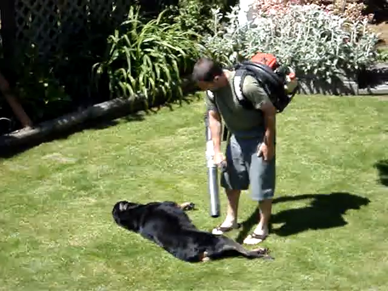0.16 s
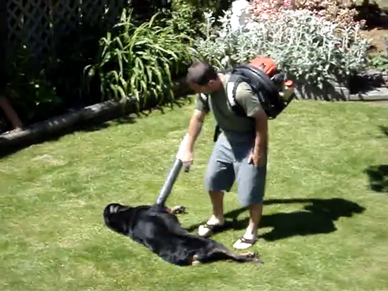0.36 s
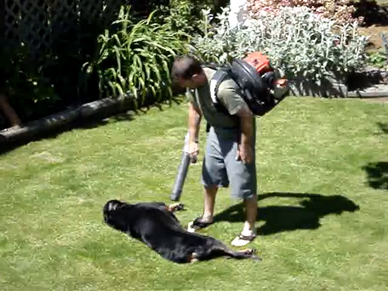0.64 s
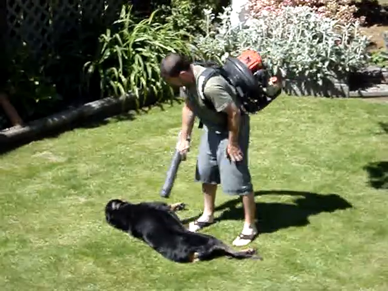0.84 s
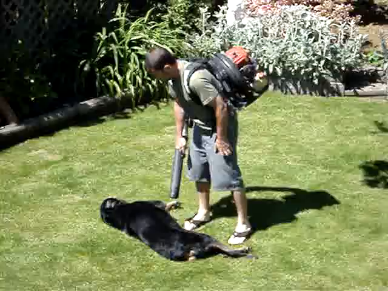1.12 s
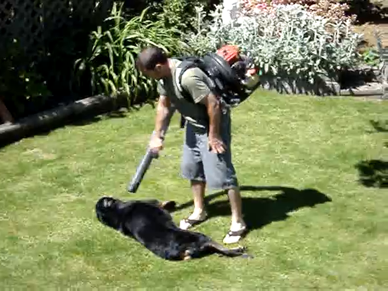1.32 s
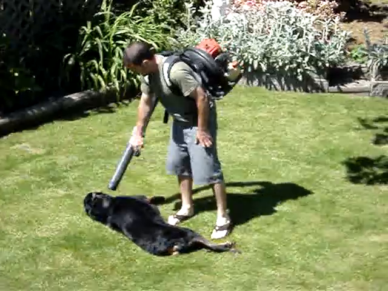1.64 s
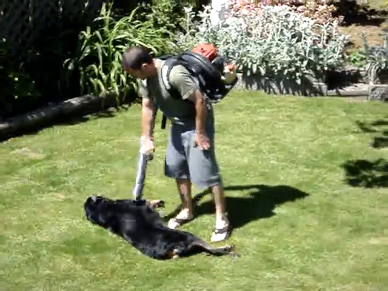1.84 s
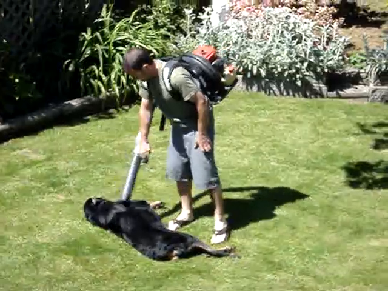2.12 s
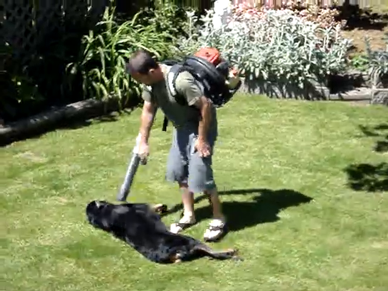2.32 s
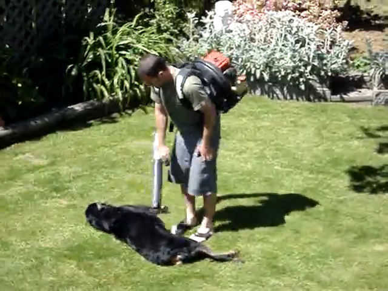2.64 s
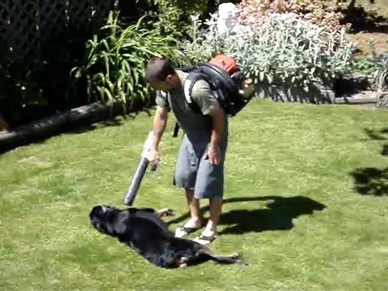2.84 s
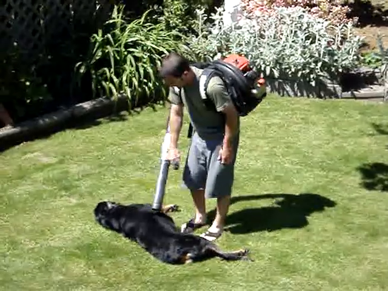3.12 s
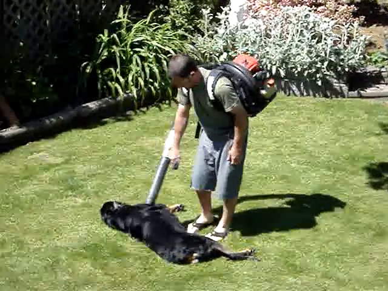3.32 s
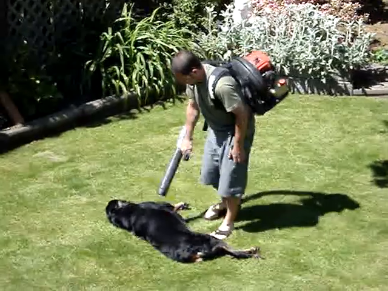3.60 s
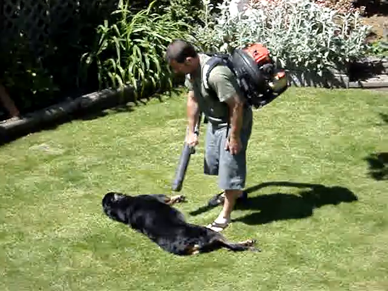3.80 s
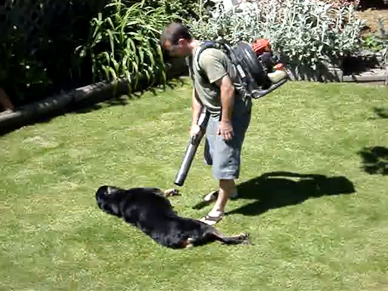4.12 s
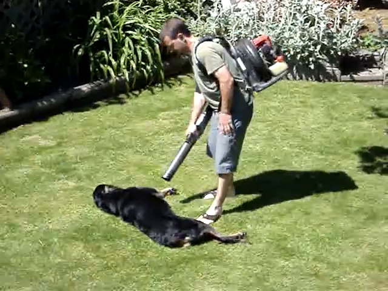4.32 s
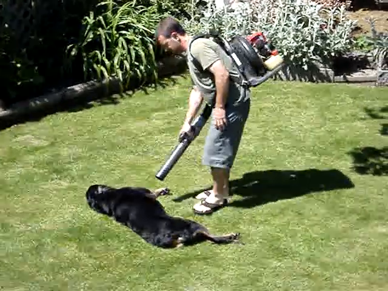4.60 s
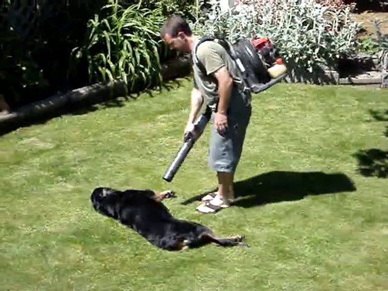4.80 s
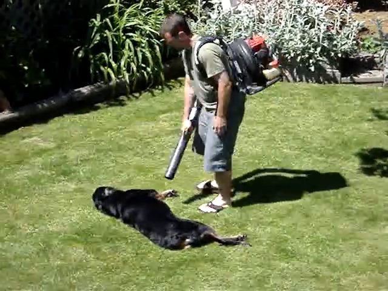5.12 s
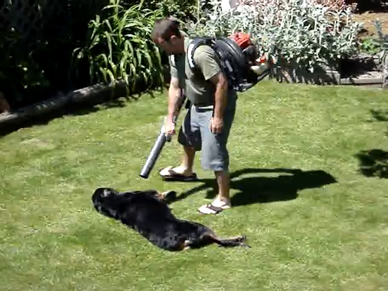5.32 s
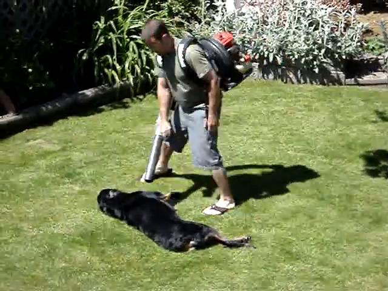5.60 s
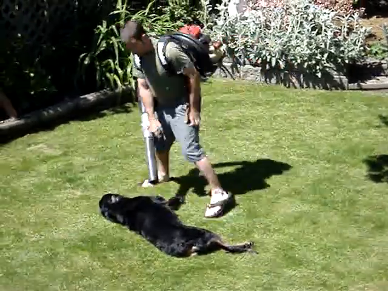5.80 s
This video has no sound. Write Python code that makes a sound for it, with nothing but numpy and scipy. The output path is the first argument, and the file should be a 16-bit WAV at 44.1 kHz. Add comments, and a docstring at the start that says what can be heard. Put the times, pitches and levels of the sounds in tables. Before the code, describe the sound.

Constant petrol blower noise in a garden: buzzing engine hum, thin whine above, roaring air jet that shifts slightly in tone as the tube swings.

```python
"""A loud buzzing hum with a whine above it and rushing air below: a two-stroke backpack leaf blower on a lawn.
Exhaust pulses, one per shaft turn, make the hum; a twelve-blade fan on the same shaft makes blade tone and whine.
Coloured noise makes the air jet. Tone changes as the carrier turns; garden reflections make single
harmonics swell and fade. The loud sound flattens the upper crests in the microphone."""
import sys
import numpy as np
from scipy import signal
from scipy.io import wavfile
from scipy.ndimage import uniform_filter1d, map_coordinates

SR = 44100
rng = np.random.default_rng(int(sys.argv[2]) if len(sys.argv) > 2 else 0)


def put_to_file(sound):
    """Save the sound as 16-bit audio at rate SR, in the file named by the first command-line argument."""
    columns = np.atleast_2d(sound).T  # one column per channel
    safe = np.clip(columns, -1, 1)
    whole_steps = np.round(safe * 32767)
    wavfile.write(sys.argv[1], SR, whole_steps.astype(np.int16))


N = 262395
T = np.arange(N) / SR
BLADES = 12


def gain_of(db):
    """Decibels to amplitude factor."""
    return 10 ** (np.asarray(db) / 20)


def evened(x):
    """Scale to rms 1."""
    return x / np.sqrt(np.mean(x ** 2) + 1e-20)


def curve(rows):
    """Two-column table joined by straight lines in time."""
    t_s, values = np.transpose(rows)
    return np.interp(T, t_s, values)


def wander(rate_hz):
    """Smooth random curve of rms 1, rate_hz random steps per second."""
    steps = rng.standard_normal(4096)
    coarse_s = T[::64]
    smooth = map_coordinates(steps, [coarse_s * rate_hz], order=3, mode="wrap")
    return evened(np.interp(T, coarse_s, smooth))


def seen_from(stance, levels_db):
    """Level at this stance, interpolated between the three sides."""
    return np.interp(stance, np.arange(len(levels_db)), levels_db)


def reflected(share, rate_hz):
    """Complex gain of direct sound plus shifting reflections; share = reflected/direct strength."""
    echoes = (wander(rate_hz) + 1j * wander(rate_hz)) / np.sqrt(2)
    return (1 + share * echoes) / np.sqrt(1 + share ** 2)


def tone(strength, phase):
    """Harmonic with complex strength; |strength| is its rms."""
    return np.sqrt(2) * (strength * np.exp(1j * phase)).real


# jet spectrum: f/Hz, relative level/dB
JET_SPECTRUM = [(20, -35), (90, -36), (190, -23.5), (300, -13.5), (470, -13), (660, -3), (1050, 0),
                (1700, -1.5), (2400, -6.5), (3000, -14), (4600, -19), (6300, -20.5), (8000, -26),
                (10000, -37.5)]
# tube and fan housing resonances: f/Hz, width/Hz, lift/dB
TUBE_RESONANCES = [(325, 22, 5), (413, 46, -5), (709, 80, 5.5), (1034, 110, 4.5), (1310, 140, 0.5),
                   (3723, 650, 8), (5540, 440, 2.4), (5680, 62, -4), (7560, 250, 0)]
# airflow as the tube swings: t/s, relative level/dB
TUBE_SWING = [(0.1, -2.8), (.42, 0.7), (.85, -2.4), (1.2, -1.3), (1.4, 0.6), (2.55, -1.1), (2.8, -0.8),
              (4.18, 1.1), (4.35, -1.8), (5.02, -3), (5.22, 1.1), (5.45, -.5), (5.94, -1.3)]


def air(level_db=-20.5, patchy_db=0.8, split_hz=1600, hiss_follow=0.31,
        gust_db=0.55, gust_hz=8, flicker_db=0.18, flicker_hz=12):
    """Turbulent noise coloured by the tube; roar swells with swing and small gusts, hiss less."""
    size, hop = 1024, 256
    frames = N // hop + 5
    f_hz = np.fft.rfftfreq(size, 1 / SR)
    frame_s = np.arange(frames) * hop / SR
    real, imag, patches = rng.standard_normal((3, frames, len(f_hz)))

    jet_hz, jet_db = np.transpose(JET_SPECTRUM)
    colour_db = np.interp(np.log(f_hz + 1), np.log(jet_hz), jet_db)
    for centre_hz, width_hz, lift_db in TUBE_RESONANCES:
        colour_db += lift_db / (1 + (2 * (f_hz - centre_hz) / width_hz) ** 2)

    patches = uniform_filter1d(patches, size=60, axis=0)  # over time
    patches = evened(uniform_filter1d(patches, size=6, axis=1))  # over frequency

    swing_db = curve(TUBE_SWING)
    roar_db = swing_db + gust_db * wander(gust_hz)
    hiss_db = hiss_follow * swing_db + flicker_db * wander(flicker_hz)
    roar_db = np.interp(frame_s, T, roar_db)[:, None]
    hiss_db = np.interp(frame_s, T, hiss_db)[:, None]
    treble = f_hz ** 2 / (f_hz ** 2 + split_hz ** 2)
    swell_db = roar_db * (1 - treble) + hiss_db * treble

    spectrum = (real + 1j * imag) * gain_of(colour_db + swell_db + patchy_db * patches)
    _, noise = signal.istft(spectrum.T, nperseg=size, noverlap=size - hop)
    return gain_of(level_db) * evened(noise[:N])


def shaft(speed_hz, jitter=0.00042, jitter_hz=45, hunt=0.000801, hunt_hz=6):
    """Shaft angle/rad; speed hunts a little, uneven firing makes it tremble (fractions of speed, rms)."""
    unrest = jitter * wander(jitter_hz) + hunt * wander(hunt_hz)
    return 2 * np.pi * np.cumsum(speed_hz * (1 + unrest)) / SR


def casing(angle, buzz_db=-53, fade_db=3, count=9):
    """Shaken casing: faint fading buzz on shaft harmonics above the exhaust's."""
    out = np.zeros(N)
    for k in 2 * BLADES + 1 + np.arange(count):
        level_db = buzz_db + fade_db * wander(3)
        out += gain_of(level_db) * np.cos(k * angle + 2 * np.pi * rng.random())
    return np.sqrt(2) * out


def burble(angle, level_db=-56, unrest=0.55):
    """Firings tend to alternate strong and weak: faint lines between the low harmonics."""
    out = np.zeros(N)
    for k in (2.5, 3.5):
        out += (1 + unrest * wander(8.8)) * np.cos(k * angle + wander(3))
    return gain_of(level_db) * out


# carrier's stance, for whine and exhaust: t/s, stance (0 facing the microphone, 1 half turned, 2 side-on)
STANCE = [(0, 0.056), (.4, 0.1), (.62, 0.85), (1.5, 1), (4.02, 1.09), (4.33, 1.82), (5.25, 2), (5.62, 1.13),
          (5.85, .3)]
# fan whine before offset: multiple of blade rate, level/dB facing, level/dB half turned, level/dB side-on
WHINE_SIDES = [(2, -43, -42.5, -48), (3, -52.5, -52.5, -52), (4, -64, -50.5, -54.5)]
# whine as the pack sways: t/s, relative level/dB
PACK_SWAY = [(0, 5), (.25, -4), (.75, 3.5), (1.5, -0.5), (2.1, -1.5), (2.85, 0), (3.3, 1.5), (3.55, 4),
             (4.15, -2), (5, 0.5), (5.5, 3), (5.94, 0.5)]


def fan_whine(angle, offset_db=1.7, echo=0.45, echo_hz=5, flutter=0.32, shake_rad=0.23):
    """Overtones of the blade tone; turbulence shakes them, reflections fade them."""
    stance, sway_db = curve(STANCE), curve(PACK_SWAY)
    out = np.zeros(N)
    for k, *sides_db in WHINE_SIDES:
        level_db = seen_from(stance, sides_db) + sway_db + offset_db
        strength = gain_of(level_db) * (1 + flutter * wander(35)) * reflected(echo, echo_hz)
        out += tone(strength, k * BLADES * angle + shake_rad * wander(28))
    return out


# lowest fan note: t/s, level/dB
BLADE_LEVEL = [(0, -21.5), (.2, -34.5), (.45, -22), (.65, -34.5), (1.6, -28), (2.6, -34), (3.25, -26),
               (4.15, -26.5), (4.4, -27.5), (4.75, -24.5), (5.6, -24.5), (5.85, -35.5)]


def blade_tone(angle, echo=0.43, echo_hz=7, flutter=0.21):
    """One puff per blade passing the outlet, as a sine at the blade rate."""
    level_db = curve(BLADE_LEVEL)
    strength = gain_of(level_db) * (1 + flutter * wander(35)) * reflected(echo, echo_hz)
    return tone(strength, BLADES * angle)


def pulse_phases(levels_db, size=128):
    """Minimum phases/rad: harmonics add up to a sharp blow followed by ringing."""
    harmonics = np.arange(1, len(levels_db) + 1)
    half_db = np.interp(np.arange(size // 2 + 1), harmonics, levels_db)
    log_gain = np.log(gain_of(half_db))
    mirrored = np.r_[log_gain, log_gain[-2:0:-1]]
    return -signal.hilbert(mirrored).imag[1:]


# exhaust pulse: multiple of shaft speed, level/dB facing, level/dB half turned, level/dB side-on
EXHAUST_SIDES = [(1, -55.5, -59, -60), (2, -41, -42.0, -42.5), (3, -45, -40, -39), (4, -36.0, -37.5, -36.5),
                 (5, -25.5, -30, -21.5), (6, -39.5, -34.0, -30.5), (7, -31, -26, -41.5),
                 (8, -21.5, -25, -30.5), (9, -27, -27, -26.5), (10, -45, -41, -47.5), (11, -50.5, -36, -41),
                 (12, -25.5, -29, -21.5), (13, -33.5, -25, -24.5), (14, -30.5, -32, -35.5),
                 (15, -37.5, -34.5, -26.5), (16, -40.5, -37.0, -28.5), (17, -43.5, -36.5, -45.5),
                 (18, -46, -45.5, -46.5), (19, -38.5, -44.5, -40.5), (20, -49.5, -42.5, -36),
                 (21, -43, -44, -36), (22, -42.5, -45.5, -56), (23, -49.5, -52.5, -50)]
# hum, harmonics 1 and 2: t/s, relative level/dB
HUM_LEVEL = [(0, -1), (.3, 3), (.7, -8.5), (1.1, -4.5), (1.65, 1.5), (3.4, 1), (3.8, -4), (4.9, 0.5),
             (5.2, 2), (5.7, 4), (5.94, -4)]
# rasp, harmonics above rasp_from: t/s, relative level/dB
RASP_LEVEL = [(0, 4), (.45, -2.5), (.7, -1.5), (1.4, 0.5), (1.85, 0.8), (2.5, 0), (3.3, 0.9), (3.85, -3),
              (4.15, 3), (4.45, -4.5), (5.2, -1), (5.45, -2.5), (5.94, 1.5)]


def exhaust(angle, echo=0.43, echo_hz=5.5, steadying=0.29, drift_rad=0.63, flutter=0.11,
            spread_rad=0.8, full_at=10.3, ringing=0.65, rasp_from=10):
    """One pulse a turn, coloured by stance; reflections fade and delay the short, weak waves most."""
    stance, hum_db, rasp_db = curve(STANCE), curve(HUM_LEVEL), curve(RASP_LEVEL)
    all_sides_db = np.array(EXHAUST_SIDES)[:, 1:]
    mean_db = all_sides_db.mean(axis=1)
    smooth_db = uniform_filter1d(mean_db, size=3)
    pulse_db = smooth_db + ringing * (mean_db - smooth_db)  # narrow peaks ring on
    phases = pulse_phases(pulse_db)
    shares = echo * gain_of(steadying * (smooth_db - mean_db))
    out = np.zeros(N)
    for k, (sides_db, share, phase) in enumerate(zip(all_sides_db, shares, phases), 1):
        if k == BLADES:  # covered by the blade tone
            continue
        exposure = min(k / full_at, 1)  # short waves feel motion most
        level_db = seen_from(stance, sides_db) + hum_db * (k <= 2) + rasp_db * (k > rasp_from)
        fading = reflected(share * exposure ** 0.82, echo_hz)
        strength = gain_of(level_db) * (1 + flutter * wander(40)) * fading
        # echoes blunt the pulse
        lag_rad = exposure ** 2 * (spread_rad * rng.standard_normal() + drift_rad * wander(1.975))
        out += tone(strength, k * angle + phase + lag_rad)
    return out


# engine speed before jitter and hunting: t/s, shaft rate f/Hz
ENGINE_SPEED = [(0.06, 121.3), (0.11, 121.6), (0.5, 121.3), (0.56, 121.8), (1.05, 121.3), (1.17, 120.6),
                (1.74, 121.1), (1.94, 120.6), (2.0, 121.2), (2.64, 121.5), (2.7, 120.9), (3.19, 121.6),
                (3.63, 121.2), (4.81, 121.5), (5.25, 120.5), (5.43, 121.1), (5.76, 120.0), (5.92, 120.8)]


def scene():
    """Engine and fan share one shaft; the air rushes over both."""
    angle = shaft(curve(ENGINE_SPEED))
    background = air() + casing(angle) + burble(angle)
    fan = fan_whine(angle) + blade_tone(angle)
    return (background + fan + exhaust(angle))[None]


def record(dry, ceiling=0.43, knee=0.014, rolloff_hz=6800, edge_hz=10080):
    """Microphone: soft ceiling on upper crests only (full scale 1), treble roll-off, band limit."""
    clipped = dry - knee * np.logaddexp(0, (dry - ceiling) / knee)
    centred = clipped - clipped.mean()
    dulled = signal.sosfilt(signal.butter(3, rolloff_hz, fs=SR, output="sos"), centred)
    low_pass = signal.firwin(801, edge_hz, window=("kaiser", 9), fs=SR)
    return signal.oaconvolve(dulled, low_pass[None], "same")


dry = scene()
out = record(dry)
put_to_file(out)
```